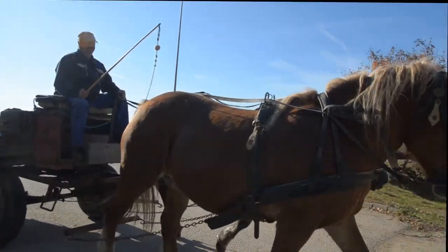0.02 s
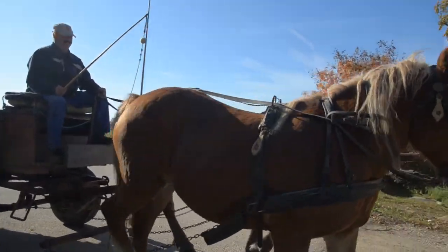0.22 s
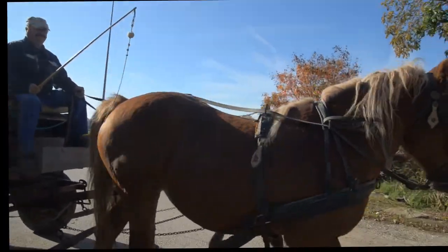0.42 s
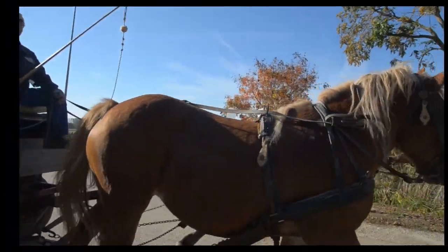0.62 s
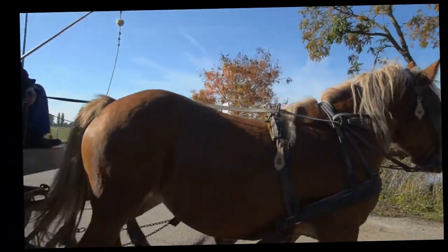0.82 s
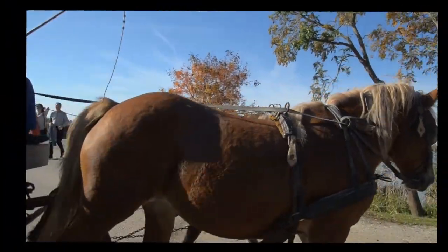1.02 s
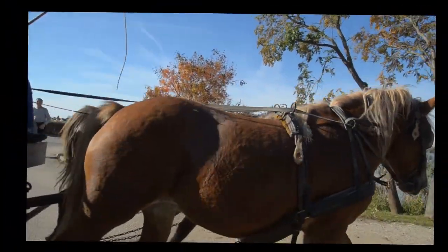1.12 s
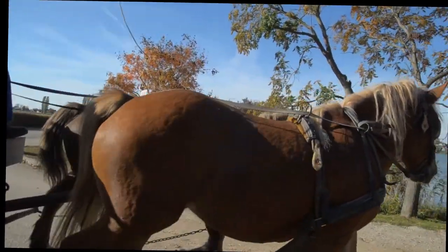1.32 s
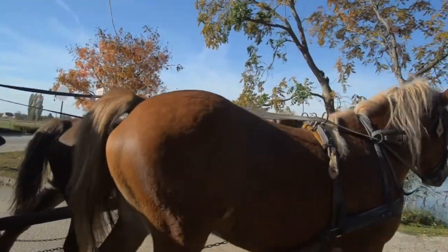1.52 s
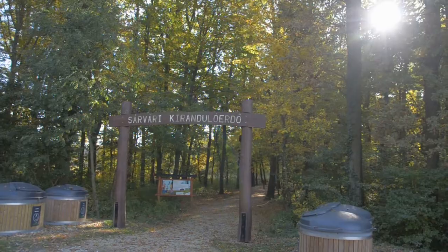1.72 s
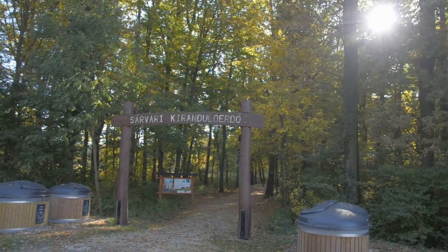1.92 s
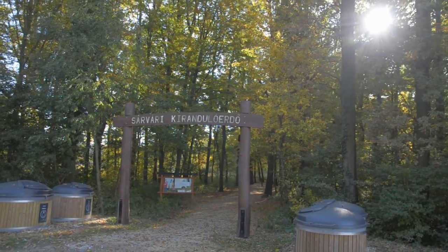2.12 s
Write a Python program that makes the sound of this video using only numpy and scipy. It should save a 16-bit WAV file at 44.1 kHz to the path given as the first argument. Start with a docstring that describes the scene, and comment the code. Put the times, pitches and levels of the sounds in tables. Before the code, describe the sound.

Uneven clusters of hollow hoof clops, dull thuds and gritty shoe scrapes pass close by outdoors, over soft tyre roll and low breeze on the microphone; a brief squeak, a last bright clank, then a sudden drop to faint hiss.

```python
"""Two shod draught horses walk past on a paved road, pulling a cart: footfalls are clusters of hollow hoof
knocks (decaying sine modes), low thuds, and shoe clacks and gritty scuffs (filtered noise and grains).
Struck or sliding steel rings, harness chains tick as noise clicks, and a gliding harmonic tone squeaks.
Tyres roll and a breeze brushes the microphone, both coloured noise. The road scene stops dead,
and the faint hiss of a wood fades in with a thin whine and small ticks."""
import sys
import numpy as np
from scipy import signal
from scipy.fft import rfft, irfft, next_fast_len
from scipy.io import wavfile
from scipy.ndimage import map_coordinates

SR = 44100
rng = np.random.default_rng(int(sys.argv[2]) if len(sys.argv) > 2 else 0)


def waveform_to_disk(signal):
    """Save audio, clipped to [-1, 1], as 16-bit WAV at the path in sys.argv[1]."""
    frames = np.transpose(np.atleast_2d(signal))
    scaled = np.clip(frames, -1, 1) * 32767
    samples = np.round(scaled).astype(np.int16)
    wavfile.write(sys.argv[1], SR, samples)


N = 97020
TIME = np.arange(N) / SR  # the whole scene (s)
LOCAL = np.arange(SR // 4) / SR  # one hit (s)

# Hoof contacts: start_s, clop_db, clop_hz, clack_db
HOOF_STRIKES = [(.0625, -46, 1490, -50.5), (.0929, -47, 887, -64.5), (.2025, -33.5, 1030, -36.5),
                (.215, -22, 1044, -34.5), (.2753, -38, 1450, -34.5), (.2925, -31.5, 1010, -36),
                (.3103, -30, 1245, -30.5), (.323, -37, 1200, -39), (.3411, -21.5, 1094, -27.5),
                (.3608, -34, 1303, -32.5), (.4047, -29.5, 1223, -37), (0.607, -40, 1170, -47.5),
                (.777, -34.5, 1550, -31), (.7875, -40, 1700, -43.5), (.902, -40, 990, -36),
                (.9056, -27.5, 1036, -30.5), (.925, -34, 1340, -45), (.936, -31, 1096, -43),
                (.9505, -29.5, 1127, -43), (.968, -33.5, 1175, -39), (.98, -35, 1144, -38.5),
                (1.027, -39.5, 1093, -56), (1.139, -41.5, 1400, -50.5), (1.161, -36, 963, -44),
                (1.172, -37, 874, -42), (1.216, -38, 1585, -36.5), (1.383, -39.5, 1590, -36),
                (1.415, -41, 1420, -53), (1.513, -35, 1034, -48.5), (1.533, -25.5, 889, -39.5),
                (1.6268, -22.5, 1577, -29.5), (1.659, -37.5, 1644, -34.5), (1.691, -37, 1570, -34)]
# Modes of the hollow hoof: ratio to clop_hz, level_db
HOOF_MODES = [(.78, -11.5), (0.999, 1.5), (1.17, -24), (1.46, -7.5)]
# Spectrum of the shoe clack: frequency_hz, level_db
CLACK_SPECTRUM = [(500, -18.5), (1500, 6.5), (2500, -0.5), (4300, -13.5), (5600, -31)]
# Spectrum of fine grit and bright snaps: frequency_hz, level_db
GRIT_SPECTRUM = [(2500, -11), (5800, -5), (9000, -12), (16000, -30)]
# A hoof takes the horse's weight: start_s, level_db, pitch_hz
WEIGHT_THUDS = [(0.0932, -42, 380), (0.214, -26, 386), (0.2919, -27.5, 433), (.406, -33, 450),
                (.606, -37, 324), (.799, -34, 490), (.904, -29.5, 414), (0.9503, -30.5, 482),
                (.968, -33.5, 394), (1.138, -37.5, 400), (1.1611, -32, 379), (1.222, -38, 460),
                (1.405, -33, 425), (1.533, -32.5, 388)]
# Bright, gritty snaps of shoe contacts: start_s, level_db
BRIGHT_SNAPS = [(.2025, -47), (.215, -46), (.284, -53.5), (.368, -57), (0.407, -51.5), (0.776, -47),
                (0.7894, -56), (.868, -54.5), (.902, -55), (1.167, -59), (1.384, -59.5), (1.6241, -39.5),
                (1.69, -54)]
# A shoe drags over the road: start_s, length_s, level_db
SHOE_SCUFFS = [(0.26, 0.026, -42), (.283, 0.0033, -34), (.329, .004, -36.5), (0.512, .018, -35.5),
               (.703, 0.0072, -43), (.729, 0.023, -35), (0.781, 0.023, -34), (0.853, 0.016, -41.5),
               (1.169, 0.0075, -34.5), (1.213, 0.023, -33), (1.27, 0.018, -37.5), (1.407, 0.01, -35),
               (1.472, 0.011, -36.5), (1.543, .018, -36.5), (1.624, .012, -28), (1.687, 0.053, -38)]
# Spectrum of the scuff's rasp: frequency_hz, level_db
SCUFF_SPECTRUM = [(150, -11), (420, -6), (680, -11), (1150, 1), (1600, -3.5), (2100, -9.5), (3200, -17),
                  (5500, -40.5)]
# Modes of the ringing steel shoe: frequency_hz, level_db, t60_s
SHOE_MODES = [(441.4, -2.5, 0.16), (1592, -6, .08), (2520, -4.5, 0.096), (2910, -2, 0.096)]
# A sliding shoe sings briefly on one note: start_s, level_db, pitch_hz
SHOE_PINGS = [(1.068, -37.5, 1590), (1.289, -42, 2736), (1.659, -28, 1557)]
# Sharper ticks of the chain links: start_s, level_db, pitch_hz
CHAIN_TICKS = [(.651, -58.5, 4220), (1.5, -47, 3900)]
# Spectrum of any small tick: ratio to pitch_hz, level_db
TICK_SPECTRUM = [(.5, -17), (1, 8), (1.6, -4), (3.5, -22.5)]
# Path of the harness squeak: time_s, pitch_hz, level_db
SQUEAK_PATH = [(0.586, 3120, -66), (.596, 2984, -46.5), (0.608, 2894, -64), (.62, 3030, -45.5),
               (.643, 3017, -53)]
# Harmonics of the squeak, from the fundamental up: level_db
SQUEAK_HARMONICS = [-1.5, -6.5, -25, -29]
# Spectrum of the rolling tyres: frequency_hz, level_db
TYRE_SPECTRUM = [(380, 2), (680, -5), (1400, -5), (2500, -16.5), (5000, -31.5), (15000, -45)]
# Swell of the breeze: time_s, level_db
BREEZE_LEVEL = [(0, -33.5), (.07, -58.5), (.138, -37.5), (.19, -49.5), (.54, -52.5), (.72, -57),
                (1.04, -57.5), (1.25, -39.5), (1.38, -44), (1.47, -56.5)]
# Spectrum of the breeze on the microphone: frequency_hz, level_db
RUMBLE_SPECTRUM = [(22, -19), (60, 9.5), (100, 11), (170, 1.5), (400, -51)]
# Spectrum of the hiss of leaves: frequency_hz, level_db
WOOD_SPECTRUM = [(25, -4), (58, 9), (130, -1), (1200, 3), (3500, -14.5), (15000, -45)]
# Fade-in of the wood: time_s, level_db
WOOD_FADE = [(1.8, -87), (1.93, -73), (2.13, -53.5)]
# Small ticks in the wood: start_s, level_db, pitch_hz
WOOD_TICKS = [(1.857, -76, 2390), (1.908, -71.5, 1795), (2.104, -64.5, 4530)]

# Decay times (s to fall 60 dB) and rise times (s)
CLOP_T60, THUD_T60, CLACK_T60, SNAP_T60 = 0.019, 0.016, 0.025, 0.021
CLOP_RISE_S, THUD_RISE_S, CLACK_RISE_S = 0.001, 0.0019, 0.00023
BITE_T60, BITE_GAIN = 0.0032, 1.8  # first bite of steel on the road, over the clack (linear gain)
CLACK_GRIT_DB, SCUFF_GRIT_DB = -28.5, -38  # fine grit, relative to the clack and to the rasp
SPRAY_PER_S = 6000  # bright grains of a clack or a snap
SCUFF_RISE_S, SCUFF_T60, RASP_PER_S = 0.0027, 0.1, 3200
SCUFF_GRIT_PER_S, SCUFF_GRIT_T60 = 1500, 0.03  # sharp grains under the shoe
FLUTTER_PER_S, SLIP_DB = 300, 2.5  # knots of fast unsteadiness; depth of the stick and slip
RING_S, RING_DB, PING_T60 = 1.626, -24, 0.13
JINGLES_PER_S, JINGLE_DB, JINGLE_HZ = 26, -74.5, 3300  # light chain ticks; mean-power level
TYRES_DB = -50.5
WHINE_HZ, WHINE_DB = 2300, -11  # thin steady tone, relative to the hiss
ECHO_DB, ECHO_RISE_S = -7.5, 0.0016  # scatter from road, horses and cart
ECHO_BAND_T60, ECHO_REST_T60 = 0.1, 0.076  # band round 2.5 kHz; all else
CUT_S = 1.7155  # the road stops dead
BLOW_S = 0.008  # span that sets the level of a hit
TOP_HZ = 15900  # middle of the upper band limit


def amp(db):
    """Decibels to gain."""
    return 10 ** (np.asarray(db) / 20)


def unit(x):
    """Scale to rms 1."""
    return x / np.sqrt(np.mean(x ** 2) + 1e-20)


def blow(x):
    """Scale a hit to rms 1 over its first moments."""
    return x / np.sqrt(np.mean(x[:int(BLOW_S * SR)] ** 2) + 1e-20)


def colour(x, points):
    """Filter by (Hz, dB) points on a log axis; beyond both ends the gain falls in step with frequency."""
    hz, db = np.transpose(points)
    size = next_fast_len(len(x) + 8192)
    f = np.fft.rfftfreq(size, 1 / SR) + 1  # the offset keeps the log finite
    skirts = np.minimum(1, hz[-1] / f) * np.minimum(1, f / hz[0])
    gain = skirts * amp(np.interp(np.log(f), np.log(hz), db))
    return irfft(rfft(x, size) * gain, size)[:len(x)]


def noise(points, size):
    """Coloured noise of rms 1."""
    return unit(colour(rng.standard_normal(size), points))


def grains(points, rate):
    """Tiny impacts of uneven size, on average rate a second, rms 1."""
    hits = rng.random(len(LOCAL)) < rate / SR
    return unit(colour(hits * rng.standard_normal(len(LOCAL)), points))


def wobble(rate):
    """A smooth random curve, rate knots a second."""
    return map_coordinates(rng.standard_normal(int(N * rate / SR) + 4), [TIME * rate])


def decay(t60, rise_s):
    """Quick rise, exponential fall."""
    return np.exp(-np.log(1000) * LOCAL / t60) * (1 - np.exp(-LOCAL / rise_s))


def stroke(length, t60):
    """Rise, hold for length, release."""
    release = np.exp(-np.log(1000) * np.maximum(LOCAL - length, 0) / t60)
    return (1 - np.exp(-LOCAL / SCUFF_RISE_S)) * release


def tone(hz):
    """A sine as long as one hit."""
    return np.sin(2 * np.pi * hz * LOCAL)


def add(track, s, x):
    """Mix x into the track at time s."""
    i = max(round(s * SR), 0)
    track[i:i + len(x)] += x[:N - i]


def outdoors(x):
    """A short diffuse echo, drawn afresh on each call; a band round 2.5 kHz outlasts the rest."""
    white = rng.standard_normal(len(LOCAL))
    band = colour(white, [(2500, 7.0), (6000, -19.5)])
    rest = white - band
    tail = band * decay(ECHO_BAND_T60, ECHO_RISE_S) + rest * decay(ECHO_REST_T60, ECHO_RISE_S)
    tail = tail / np.linalg.norm(tail)
    return x + amp(ECHO_DB) * signal.fftconvolve(x, tail)[:len(x)]


def hoof_knock(clop_hz):
    """The hollow hoof rings in a few short modes, slightly different at each contact."""
    modes = np.zeros(len(LOCAL))
    for ratio, db in HOOF_MODES:
        gain = rng.choice([-1, 1]) * amp(db + rng.normal(0, 2))
        modes += gain * tone(clop_hz * ratio * (1 + rng.normal(0, 0.018)))
    return blow(modes * decay(CLOP_T60, CLOP_RISE_S))


def shoe_clack():
    """Steel clacks on the road as a noise burst with a sharp first bite and a snap of grit."""
    bite = decay(CLACK_T60, CLACK_RISE_S) + BITE_GAIN * decay(BITE_T60, CLACK_RISE_S)
    steel = blow(noise(CLACK_SPECTRUM, len(LOCAL)) * bite)
    grit = blow(grains(GRIT_SPECTRUM, SPRAY_PER_S) * bite)
    return steel + amp(CLACK_GRIT_DB) * grit


def hooves():
    """Each contact excites the hollow hoof and the steel shoe together."""
    out = np.zeros(N)
    for s, clop_db, clop_hz, clack_db in HOOF_STRIKES:
        contact = amp(clop_db) * hoof_knock(clop_hz) + amp(clack_db) * shoe_clack()
        add(out, s, outdoors(contact))
    return out


def thuds():
    """The weight comes down: a few low cycles, with a weaker mode below."""
    out = np.zeros(N)
    for s, db, hz in WEIGHT_THUDS:
        modes = tone(hz) + amp(-7) * tone(0.69 * hz)
        add(out, s, outdoors(amp(db) * blow(modes * decay(THUD_T60, THUD_RISE_S))))
    return out


def bright_snaps():
    """A short spray of bright grains."""
    out = np.zeros(N)
    for s, db in BRIGHT_SNAPS:
        spray = grains(GRIT_SPECTRUM, SPRAY_PER_S) * decay(SNAP_T60, CLACK_RISE_S)
        add(out, s, outdoors(amp(db) * blow(spray)))
    return out


def scuffs():
    """The shoe sticks and slips: the rough road rattles in clumps, each scuff at its own pitch."""
    out = np.zeros(N)
    for s, length, db in SHOE_SCUFFS:
        pitch = np.exp(rng.normal(0, 0.06))
        slips = unit(amp(SLIP_DB * wobble(FLUTTER_PER_S)[:len(LOCAL)]))
        envelope = stroke(length, SCUFF_T60)
        spectrum = [(hz * pitch, level) for hz, level in SCUFF_SPECTRUM]
        rasp = grains(spectrum, RASP_PER_S) * envelope
        grit = grains(GRIT_SPECTRUM, SCUFF_GRIT_PER_S) * stroke(length, SCUFF_GRIT_T60)
        scrape = slips * (rasp + amp(SCUFF_GRIT_DB) * grit)
        # give every scrape the energy of its envelope
        scrape *= np.linalg.norm(envelope) / np.linalg.norm(scrape)
        add(out, s, outdoors(amp(db) * scrape))
    return out


def ring(hz, t60):
    """A steel mode, its phase shaken by the rubbing road."""
    shake = 0.5 * wobble(FLUTTER_PER_S)[:len(LOCAL)]  # (rad)
    return np.sin(2 * np.pi * hz * LOCAL + shake) * decay(t60, THUD_RISE_S)


def shoe_ring():
    """Steel rings in several modes after one hard landing and sings on single notes as it slides."""
    out = np.zeros(N)
    chord = sum(amp(db) * ring(hz, t60) for hz, db, t60 in SHOE_MODES)
    add(out, RING_S, outdoors(amp(RING_DB) * chord))
    for s, db, hz in SHOE_PINGS:
        add(out, s, amp(db) * ring(hz, PING_T60))
    return out


def ticks(rows, t60):
    """Small dry clicks: decaying noise, each around its own pitch."""
    out = np.zeros(N)
    for s, db, hz in rows:
        spectrum = [(hz * ratio, level) for ratio, level in TICK_SPECTRUM]
        click = noise(spectrum, len(LOCAL)) * decay(t60, CLACK_RISE_S)
        add(out, s, amp(db) * blow(click))
    return out


def chains():
    """The trace chains tick lightly all along, now and then more sharply."""
    draws = rng.random((int(JINGLES_PER_S * CUT_S), 2))
    small = []
    for when, size in draws:
        level_db = JINGLE_DB + 10 * np.log10(-np.log(size))  # exponential spread of power
        small.append((CUT_S * when, level_db, JINGLE_HZ))
    return ticks(CHAIN_TICKS + small, t60=0.01)


def squeak():
    """Metal rubs on metal in the harness: a short, unsteady whistle with overtones."""
    s, hz, db = np.transpose(SQUEAK_PATH)
    pitch = np.interp(TIME, s, hz) * (1 + 0.0044 * wobble(200))
    phase = 2 * np.pi * np.cumsum(pitch) / SR
    level = np.interp(TIME, s, amp(db), left=0, right=0) * amp(2 * wobble(FLUTTER_PER_S))
    return level * sum(amp(d) * np.sin(k * phase) for k, d in enumerate(SQUEAK_HARMONICS, 1))


def tyres():
    """Tyres roll on without a break: coloured noise with a wavering level."""
    return amp(TYRES_DB + 2.7 * wobble(30.7)) * noise(TYRE_SPECTRUM, N)


def breeze():
    """Gusts rumble on the microphone: low noise that swells and sinks."""
    return amp(np.interp(TIME, *np.transpose(BREEZE_LEVEL))) * noise(RUMBLE_SPECTRUM, N)


def wood():
    """Faint noise hiss of leaves and a thin sine whine fade in, with a few small ticks."""
    whine = amp(WHINE_DB) * np.sin(2 * np.pi * WHINE_HZ * TIME)
    fade = amp(np.interp(TIME, *np.transpose(WOOD_FADE)))
    return fade * (noise(WOOD_SPECTRUM, N) + whine) + ticks(WOOD_TICKS, t60=0.011)


def scene():
    """The road until the cut, then the wood."""
    horses = hooves() + thuds() + bright_snaps() + scuffs() + shoe_ring()
    harness = chains() + outdoors(squeak())
    road = horses + harness + tyres() + breeze()
    return (road * (TIME < CUT_S) + wood())[None]


def record(dry):
    """Limit the band: the treble slopes to nothing over 600 Hz around the top frequency."""
    size = next_fast_len(N + SR // 2)
    keep = np.clip((TOP_HZ - np.fft.rfftfreq(size, 1 / SR)) / 600 + 0.5, 0, 1)
    return irfft(rfft(dry, size) * keep, size)[:, :N]


dry = scene()
out = record(dry)
waveform_to_disk(out)
```